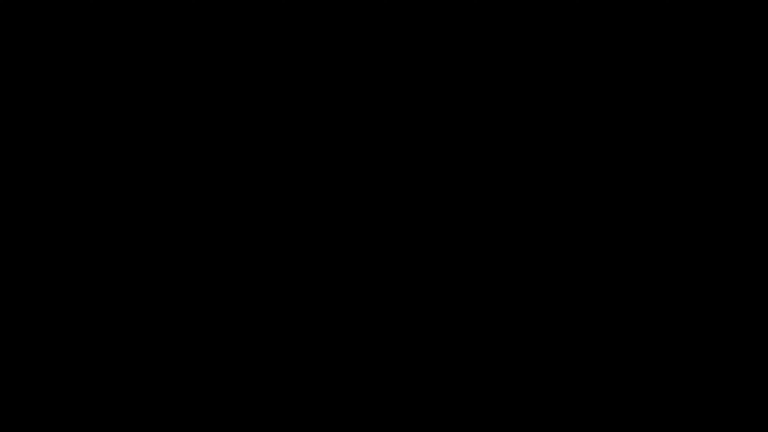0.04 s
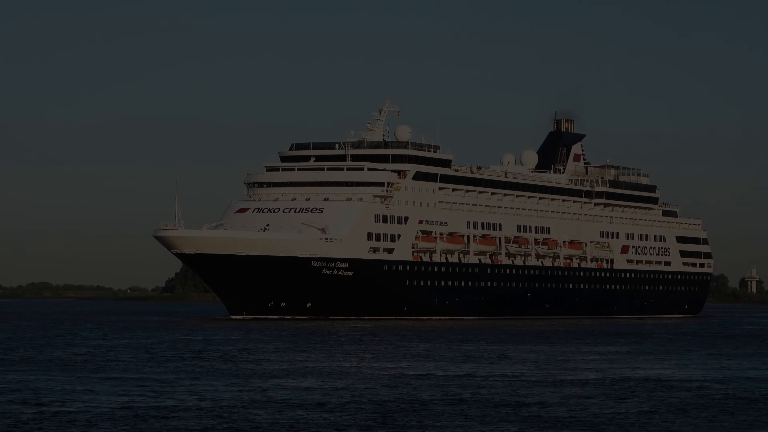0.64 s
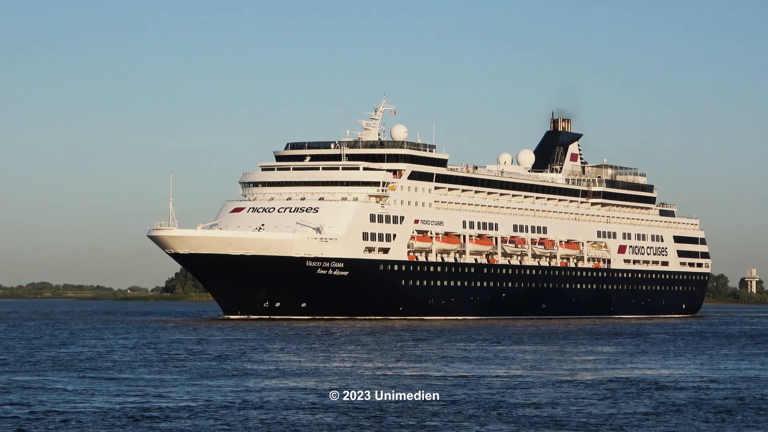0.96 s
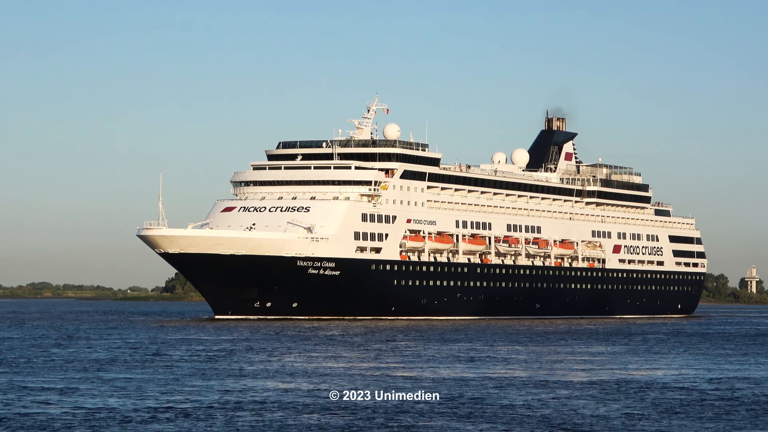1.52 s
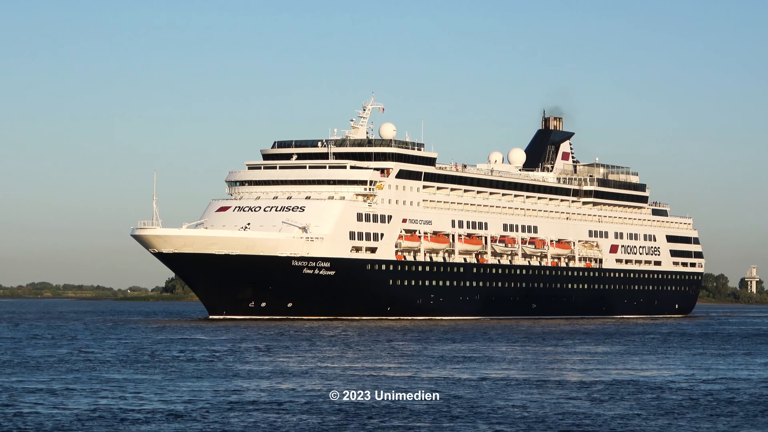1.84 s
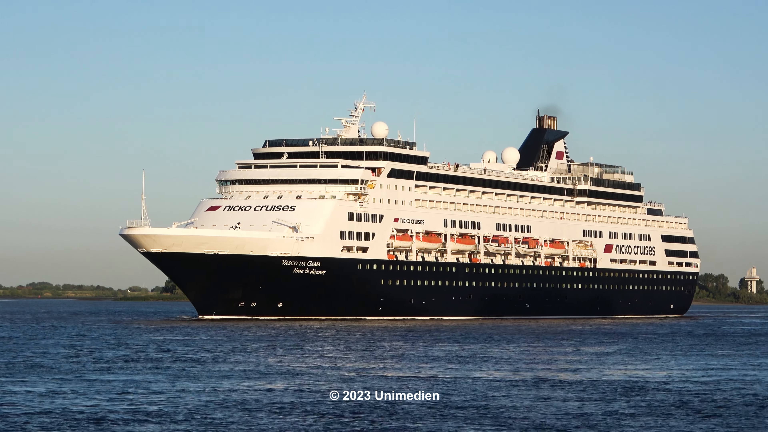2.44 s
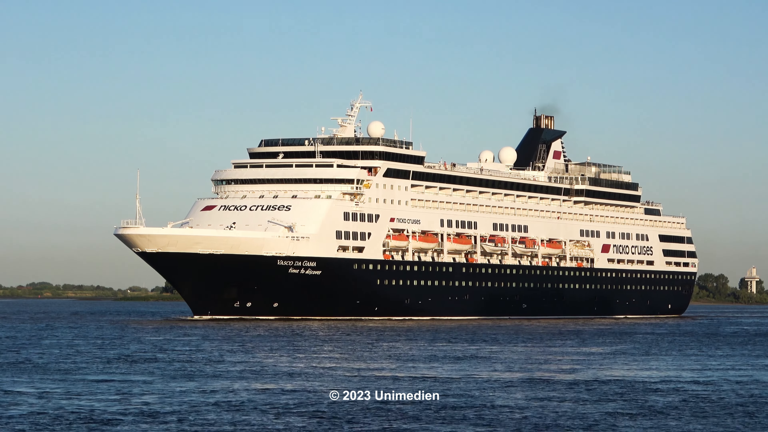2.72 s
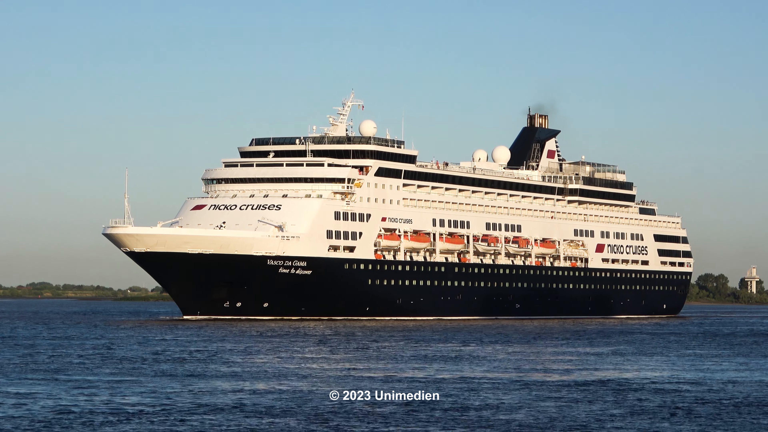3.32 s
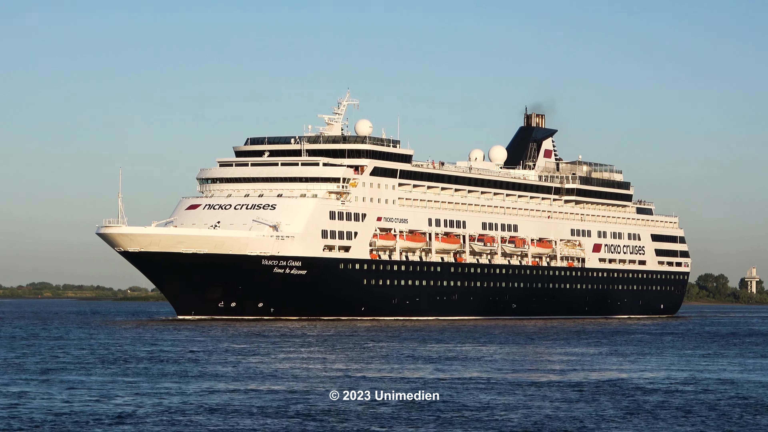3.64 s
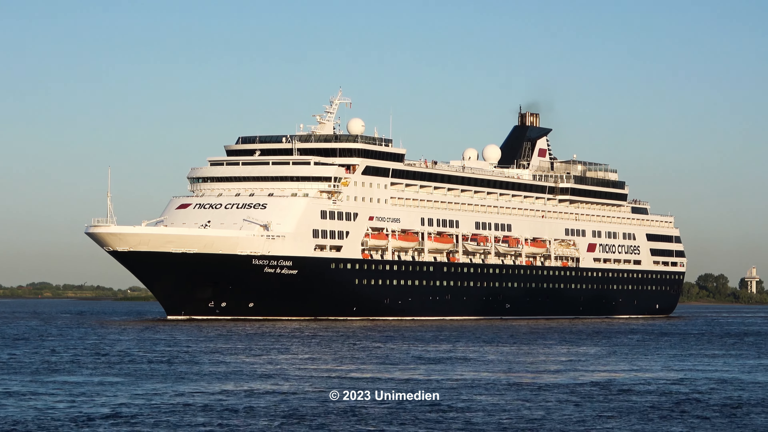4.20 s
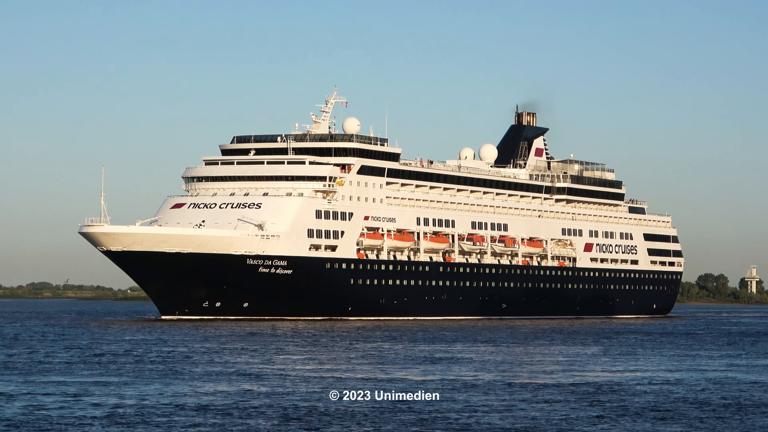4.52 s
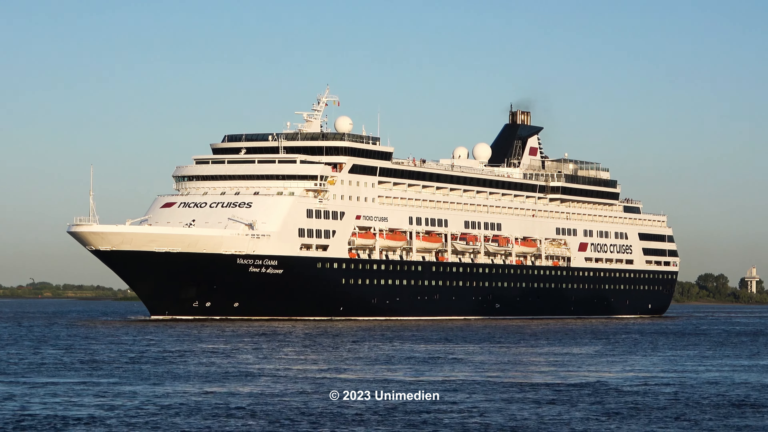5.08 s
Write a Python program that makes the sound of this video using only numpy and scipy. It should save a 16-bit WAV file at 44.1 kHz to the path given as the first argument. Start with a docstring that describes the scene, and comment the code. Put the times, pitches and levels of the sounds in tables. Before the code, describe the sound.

After silence, the sound of a large ship on open water fades in between about 0.5 and 1.1 seconds. It is distant and slightly to the left: a steady, hollow roar of ventilation fans, drifting gently in level, over a deep exhaust rumble and a throbbing diesel hum that grows slightly. This continues to the end, at about 6 seconds.

Close by at the shore, much quieter, ripples hiss and tiny bubbles crackle throughout. One soft wave washes in at around 1.4 seconds. Small water plops come at about 1.2, 1.6 and 4.1 seconds, and little splashes sound slightly to the right, most clearly near 2.8 seconds. The fizz lifts as wavelets lap at around 3.1, 4 and 4.9 seconds. A few tiny dry clicks occur nearby, the sharpest at 4.4 seconds and another at 5.3.

```python
"""A large ship passes far off on open water, fading in from silence. Its ventilators roar through
ringing ducts, drifting with the breeze and coloured by one reflection near the listener.
Underneath, exhaust gas rumbles out of the funnel and the diesels throb.
At the shore, ripples fizz, one wave washes in, and bubbles crackle and plop
among little splashes and a few dry clicks close by."""
import sys
import numpy as np
from scipy import signal
from scipy.fft import rfft, irfft, next_fast_len
from scipy.io import wavfile
from scipy.ndimage import map_coordinates

SR = 44100
rng = np.random.default_rng(int(sys.argv[2]) if len(sys.argv) > 2 else 0)


def store_wav(level_fs):
    """Save 16-bit WAV to argv[1]."""
    pcm = np.round(np.clip(np.atleast_2d(level_fs), -1, 1) * 32767)
    wavfile.write(sys.argv[1], SR, pcm.T.astype(np.int16))


N = 271215
TOP_HZ = 15800

# The tone of the fan roar. Each row: frequency in Hz, relative level in dB.
FAN_SPECTRUM = [(90, -5), (210, 0.5), (340, -1), (500, 2), (720, -1), (1100, -5.5), (1450, -9.5),
                (2200, -14.5), (3200, -20.5), (4200, -27.5), (5200, -32.5), (7000, -46), (11000, -51.5),
                (16000, -46)]
# Peaks and dips the ducts put in the roar. Each row: centre in Hz, width in Hz, gain in dB.
DUCT_RESONANCES = [(236, 18, 5), (283.5, 8.9, 3.5), (329, 133, 2.5), (471, 34, -2.5), (568, 16, 3),
                   (634, 16, 3), (676, 16, 4), (790, 95, 3.5), (895, 170, -2.5), (1008, 60, 4),
                   (1154, 113, 3.5), (3970, 75, 3.5)]
# How well the roar carries on the breeze. Each row: time in seconds, body gain in dB, treble gain in dB.
BREEZE_CARRY = [(1.2, -36, -47.5), (1.9, -35, -45.5), (2.4, -35, -45), (2.85, -37, -47.5), (3.2, -36, -45),
                (3.7, -35.5, -46.0), (3.95, -36.5, -47), (4.7, -36.5, -47.5), (5.35, -36.5, -46.5),
                (5.85, -35, -45), (6.15, -34.5, -45.5)]
# The tone of the funnel's rumble. Each row: frequency in Hz, relative level in dB.
EXHAUST_SPECTRUM = [(14, -17), (21, -5), (33, -11), (44, -1.5), (55, 2), (80, 3.5), (96, -1.5), (128, 1),
                    (165, -3.5), (205, -8.5), (320, -41), (800, -62)]
# The engines' drone. Each row: pitch in Hz, relative level in dB, pitch waver in Hz.
DIESEL_TONES = [(23.2, -51, 1.15), (35.7, -51, 2.76), (56.6, -53.5, 0.83), (61.87, -51, 1.19),
                (73.4, -50.5, 1.29), (151.4, -60.5, 0.77), (340.3, -54, 2.93), (399, -55, 1.24)]
# Where the ship sits in the stereo image. Each row: frequency in Hz, left minus right in dB.
SHIP_PAN = [(25, .3), (80, 1.3), (210, 3.6), (440, 0), (830, 2.3), (1300, -.8), (1750, .8), (2100, 0)]
# The stereo width of distant noise. Each row: frequency in Hz, side minus mid in dB.
FAR_WIDTH = [(25, -24), (70, -21), (180, -21), (400, -21.5), (1500, -20.5), (3500, -33), (8000, -28)]
# Plops and plips of water. Each row: start in seconds, peak level in dB, pitch in Hz,
# left minus right in dB.
WATER_PLOPS = [(1.243, -40, 1740, 0), (1.624, -33.5, 1100, 2), (3.187, -46, 6260, -11),
               (4.073, -34, 1195, 1), (4.426, -48.5, 5050, 0), (5.3444, -44, 6540, 1),
               (5.3485, -49, 6660, 9)]
# Dry clicks close by. Each row: start in seconds, relative level in dB, pitch in Hz,
# time to fall 60 dB in seconds, left minus right in dB.
DRY_CLICKS = [(3.142, -49, 6800, 0.018, -9), (4.4005, -27.5, 5530, 0.0042, 2),
              (4.404, -40.5, 4660, 0.017, 0), (4.868, -51.5, 7000, .016, 6),
              (5.3445, -39.5, 6400, 0.0069, 4)]
# Little splashes at one spot on the right. Each row: start in seconds, relative level in dB, pitch in Hz.
SHORE_SPLASHES = [(1.086, -54, 5800), (1.244, -46, 1900), (2.541, -55.5, 8450), (2.813, -42.5, 2470),
                  (2.817, -56, 8500), (2.880, -45, 3030), (3.151, -56, 8450), (4.049, -56, 7500),
                  (5.496, -57, 7600)]
# Wavelets lapping the shore. Each row: crest time in seconds, lift in dB, half length in seconds.
SHORE_WAVELETS = [(3.11, 9, 0.15), (4.05, 5.5, 0.47), (4.85, 5, 0.38), (5.55, 1, 0.12)]
# The tone of fine spray and ripple hiss. Each row: frequency in Hz, relative level in dB.
RIPPLE_SPECTRUM = [(1500, -22), (4200, -20), (5700, 9), (9000, 4), (12500, 2), (15800, -9.5)]


def ventilators(body_trim_db=-4, treble_trim_db=-3.5, split_hz=1500, flutter_db=0.66):
    """Fans roar through resonant ducts; a reflection just behind the direct sound carves even notches."""
    def colour(hz):
        ducts_db = sum(db / (1 + (2 * (hz - centre) / width) ** 2)
                       for centre, width, db in DUCT_RESONANCES)
        return amp(along(FAN_SPECTRUM, hz) + ducts_db)

    def notches(hz, delay_s=0.002812, bounce=0.4, scatter_hz=2400):
        reflection = bounce / (1 + (hz / scatter_hz) ** 2)  # the rough surface scatters the treble
        return np.abs(1 + reflection * np.exp(-2j * np.pi * hz * delay_s))

    roar = far_noise(colour, notches)
    body = filtered(roar, lambda hz: 1 / (1 + (hz / split_hz) ** 6))
    treble = roar - body
    body_db, treble_db = curves(BREEZE_CARRY)
    eddies = amp(flutter_db * wobble(24))  # turbulence along the path shakes the level
    return eddies * (amp(body_trim_db + body_db) * unit(body)
                     + amp(treble_trim_db + treble_db) * unit(treble))


def exhaust(level_db=-43):
    """Turbulent gas leaves the funnel as a deep, steady rumble."""
    return amp(level_db) * far_noise(lambda hz: amp(along(EXHAUST_SPECTRUM, hz)))


def diesels(growth_db_per_s=0.4):
    """The low tones of several engines beat together and grow as the ship nears."""
    t = np.arange(N) / SR
    drone = sum(amp(db) * far_tone(hz, waver_hz) for hz, db, waver_hz in DIESEL_TONES)
    return amp(growth_db_per_s * (t - t.mean())) * drone


def generators(level_db=-49.5, beat_hz=1.35, crest_s=3.12, depth=0.24):
    """Two generators run slightly apart, so their hum beats."""
    t = np.arange(N) / SR
    beat = np.abs(1 + depth * np.exp(2j * np.pi * beat_hz * (t - crest_s)))
    return amp(level_db) * beat * far_tone(hz=120, waver_hz=0.575)


def plops(cycles_to_peak=4.9, rise=0.006):
    """Each trapped bubble swells, rings briefly and bends a touch up in pitch."""
    out, t = np.zeros((2, N)), np.arange(SR // 10) / SR
    for start, db, hz, pan_db in WATER_PLOPS:
        age = hz * t / cycles_to_peak
        envelope = age ** 2 * np.exp(2 * (1 - age))
        ring = np.sin(2 * np.pi * hz * t * (1 + rise * age))
        add(out, start, amp(db) * pan(pan_db) * envelope * ring)
    return out


def clicks_and_splashes(splash_t60_s=0.079, splash_pan_db=-3.5, attack_s=0.00025, soft_hz=11500):
    """Each is a crack of noise coloured around its pitch, with one short ring and a soft top."""
    out, t = np.zeros((2, N)), np.arange(SR // 16) / SR
    splashes = [(start, db, hz, splash_t60_s, splash_pan_db) for start, db, hz in SHORE_SPLASHES]
    for start, db, hz, t60, pan_db in list(DRY_CLICKS) + splashes:
        noise = rng.standard_normal(len(t)) + 0.5 * rng.standard_normal((2, len(t)))
        crack = unit(signal.lfilter(*signal.iirpeak(hz, Q=3.3, fs=SR), noise))
        ring = np.sin(2 * np.pi * hz * t)
        envelope = amp(db - 60 * t / t60) * (1 - np.exp(-t / attack_s))
        add(out, start, pan(pan_db) * envelope * (0.76 * crack + 0.21 * ring))
    return filtered(out, lambda hz: 1 / np.sqrt(1 + (hz / soft_hz) ** 6))


def wash(start_s=1.41, rise_s=0.07, fall_s=0.15, level_db=-50, low_hz=1500, high_hz=3700):
    """One wave runs up the shore: a soft rush that rises quickly and drains away."""
    age = np.maximum(np.arange(N) / SR - start_s, 0)
    swell = np.minimum(age / rise_s, 1) * np.exp(-np.maximum(age - rise_s, 0) / fall_s)
    rush = far_noise(lambda hz: hz / (hz + low_hz) / (1 + (hz / high_hz) ** 5))
    return amp(level_db) * swell * rush


def bubbles(count=420, level_db=-62, spread_db=3.5, pitch_hz=7000, pitch_spread=0.16, width_db=6):
    """Tiny bubbles burst all along the water's edge as a dry crackle, louder under each wavelet."""
    out, t = np.zeros((2, N)), np.arange(SR // 100) / SR
    lap_db = lapping()
    for at, (size, pitch, place) in zip(rng.integers(0, N, count), rng.standard_normal((count, 3))):
        cycles = t * min(pitch_hz * np.exp(pitch_spread * pitch), TOP_HZ)
        db = level_db + lap_db[at] + spread_db * size
        burst = cycles * np.exp(1 - cycles) * np.sin(2 * np.pi * cycles)  # peaks after one cycle
        add(out, at / SR, amp(db) * pan(width_db * place) * burst)
    return out


def ripples(level_db=-68.5, follow=0.22):
    """A wide, even bed of hiss that lifts a little as wavelets arrive."""
    noise = rng.standard_normal((2, N)) + 0.4 * rng.standard_normal(N)
    hiss = unit(filtered(noise, lambda hz: amp(along(RIPPLE_SPECTRUM, hz))))
    return amp(level_db + follow * lapping()) * hiss


def lapping():
    """The lift in dB above calm water: each wavelet swells and ebbs as a bell curve."""
    t = np.arange(N) / SR
    return sum(db * np.exp(-((t - crest) / half) ** 2) for crest, db, half in SHORE_WAVELETS)


def far_tone(hz, waver_hz, swell_db=0.5):
    """A distant tone at rms 1; moving air makes its pitch and level waver."""
    phase = 2 * np.pi * (np.cumsum(hz + waver_hz * wobble(6)) / SR + rng.random())
    return unit(amp(swell_db * wobble(5)) * np.sin(phase))


def far_noise(colour, direct=lambda hz: 1):
    """Distant noise at rms 1: a direct part in the centre and a faint diffuse part at the sides."""
    mid, side = rng.standard_normal((2, N))
    mid = filtered(mid, lambda hz: colour(hz) * direct(hz))
    side = filtered(side, lambda hz: colour(hz) * amp(along(FAR_WIDTH, hz)))
    return unit(np.array([mid + side, mid - side]))


def amp(db):
    """Decibels to gain."""
    return 10 ** (np.asarray(db) / 20)


def pan(db):
    """A pair of channel gains, the left db above the right."""
    return amp([[db / 2], [-db / 2]])


def unit(x):
    """x at rms 1."""
    return x / np.sqrt(np.mean(x ** 2) + 1e-20)


def along(points, hz):
    """(Hz, value) points read on a log frequency axis."""
    freqs, values = np.transpose(points)
    return np.interp(np.log(hz + 1), np.log(freqs + 1), values)


def curves(rows):
    """An automation curve for each column after the time."""
    times, *columns = np.transpose(rows)
    return [np.interp(np.arange(N) / SR, times, column) for column in columns]


def wobble(rate):
    """A smooth random curve, rate knots a second."""
    knots = rng.standard_normal(int(N * rate / SR) + 4)
    return map_coordinates(knots, [np.arange(N) * rate / SR])


def filtered(x, response):
    """x through an EQ whose gain is response(hz)."""
    size = next_fast_len(N + SR // 2)
    return irfft(rfft(x, size) * response(np.fft.rfftfreq(size, 1 / SR)), size)[..., :N]


def add(track, start_s, sound):
    """Mix a short sound into a track."""
    part = track[..., round(start_s * SR):][..., :sound.shape[-1]]
    part += sound[..., :part.shape[-1]]


def scene():
    """The ship lies a little to the left; water and clicks are near."""
    ship = diesels() + generators() + exhaust() + ventilators()
    ship = filtered(ship, lambda hz: amp(np.outer([0.5, -0.5], along(SHIP_PAN, hz))))
    return ship + ripples() + wash() + bubbles() + plops() + clicks_and_splashes()


def record(dry):
    """A straight fade-in from silence, with the very top cut away."""
    fade = np.interp(np.arange(N) / SR, [0.55, 1.133], [0, 1])
    return filtered(dry * fade, lambda hz: hz < TOP_HZ)


dry = scene()
out = record(dry)
store_wav(out)
```